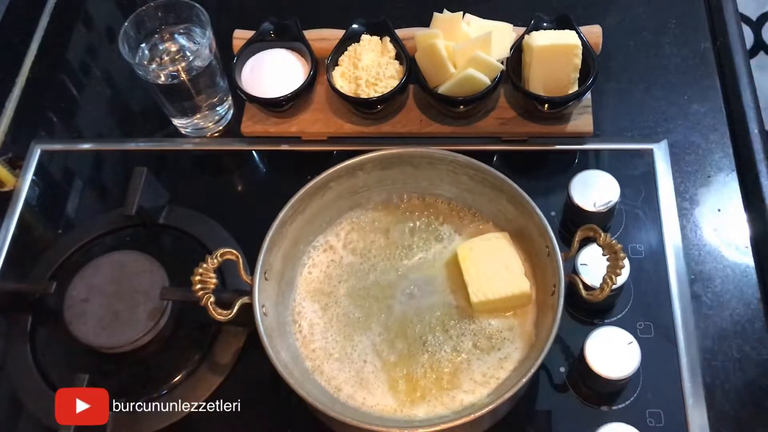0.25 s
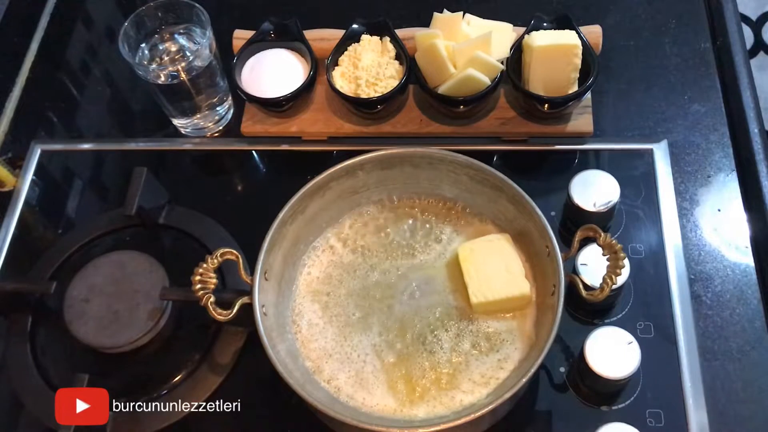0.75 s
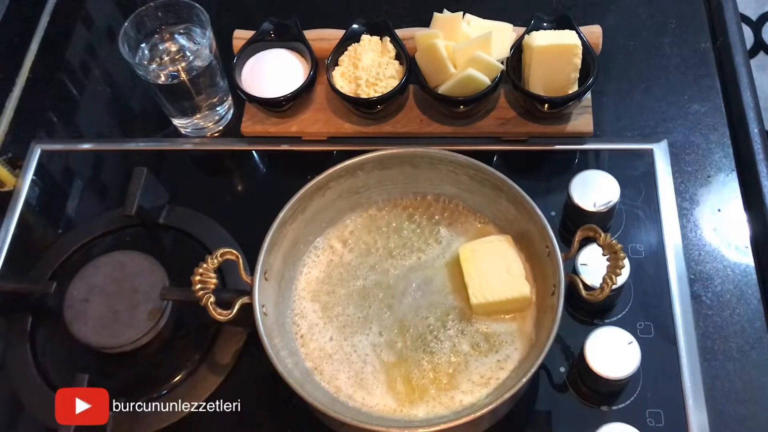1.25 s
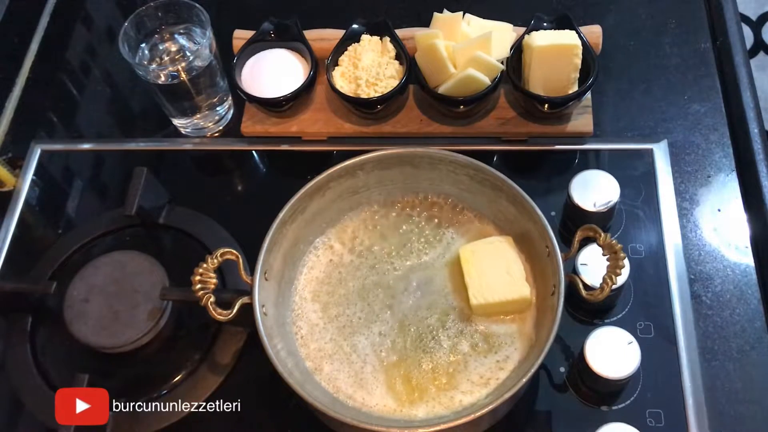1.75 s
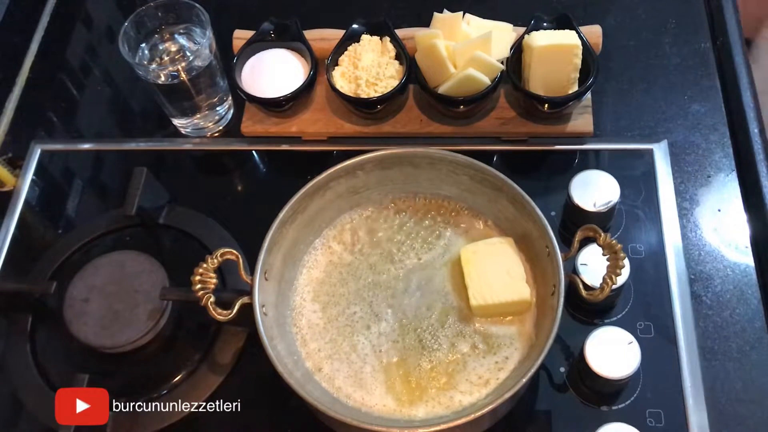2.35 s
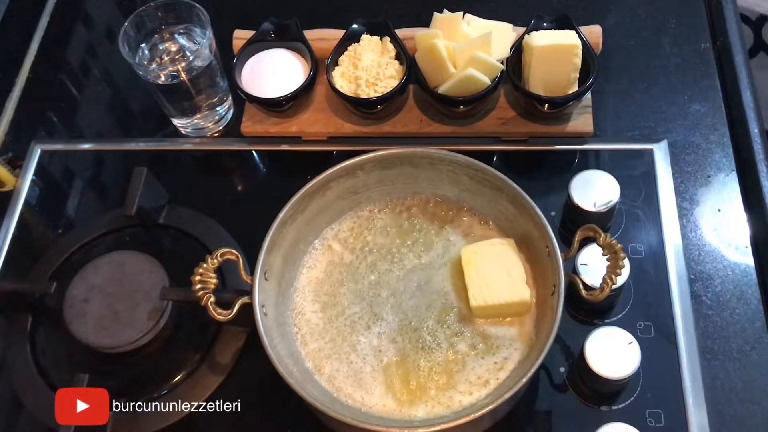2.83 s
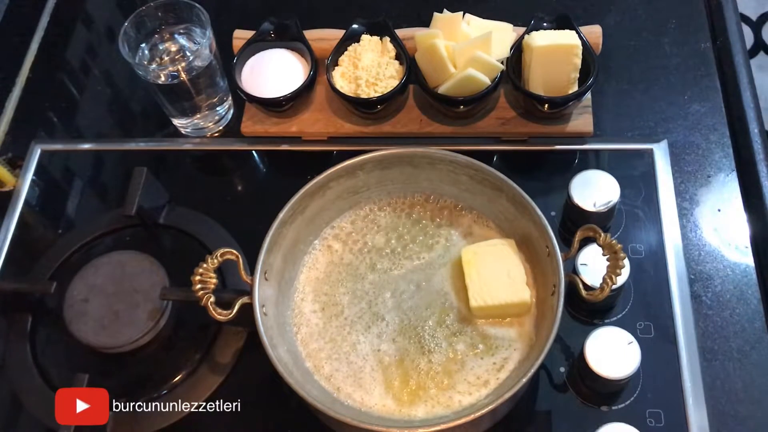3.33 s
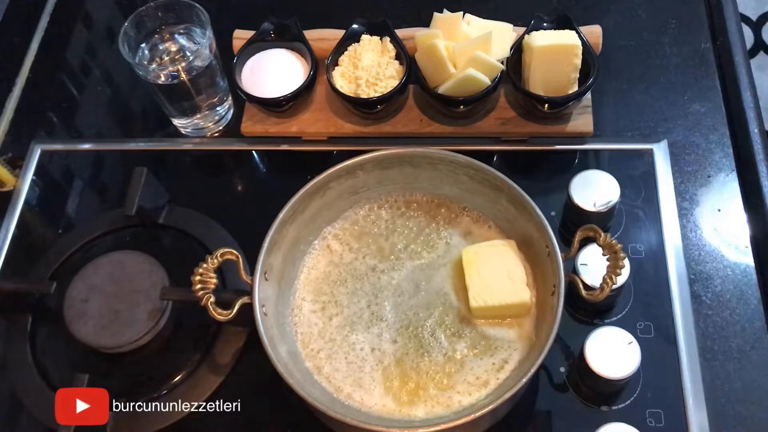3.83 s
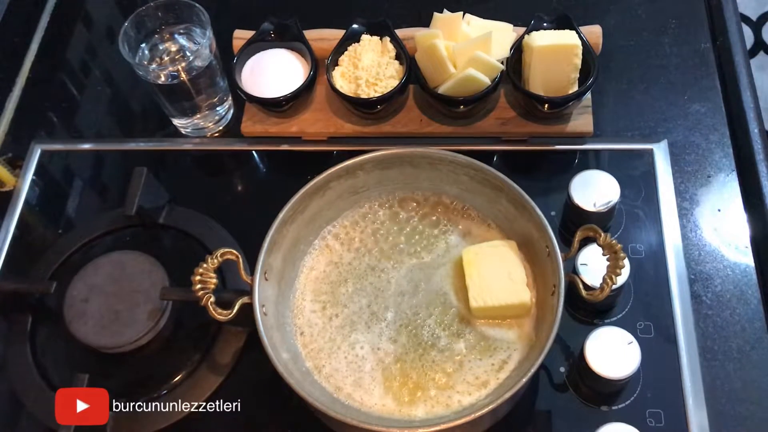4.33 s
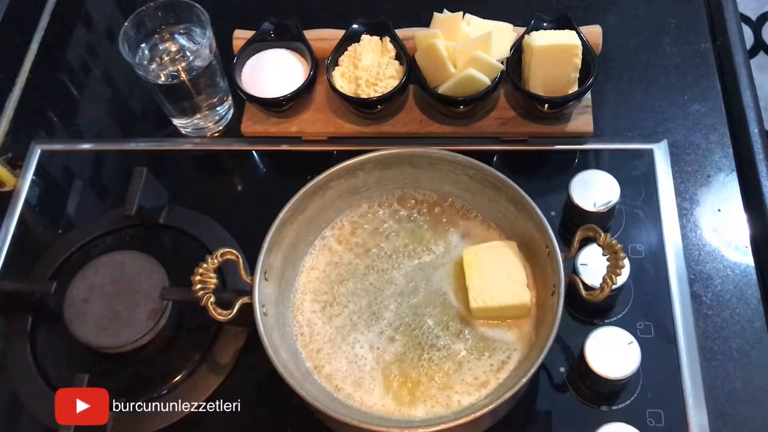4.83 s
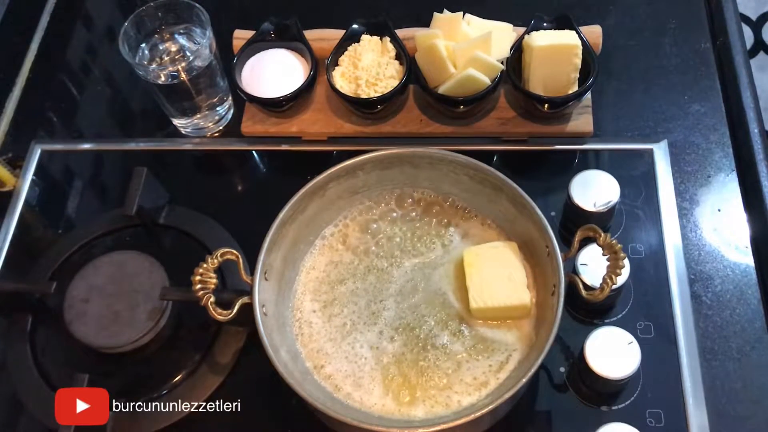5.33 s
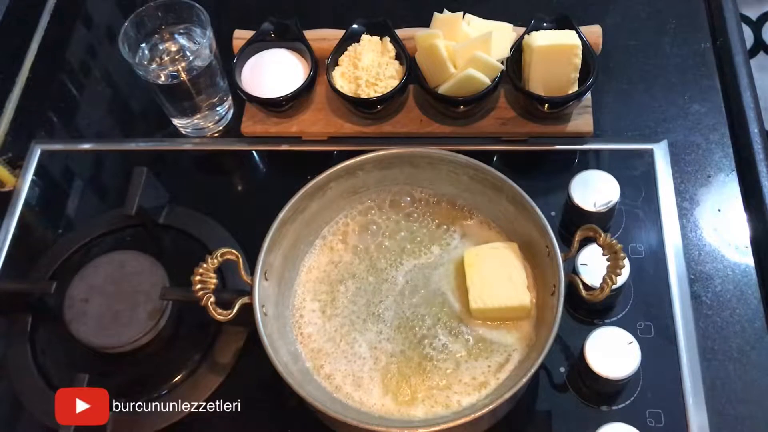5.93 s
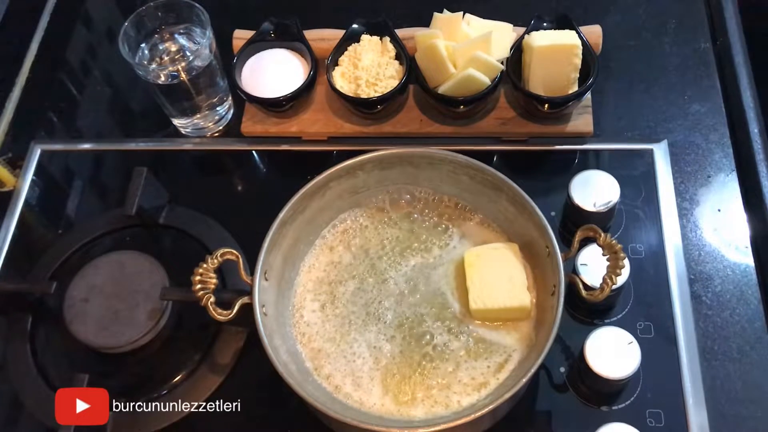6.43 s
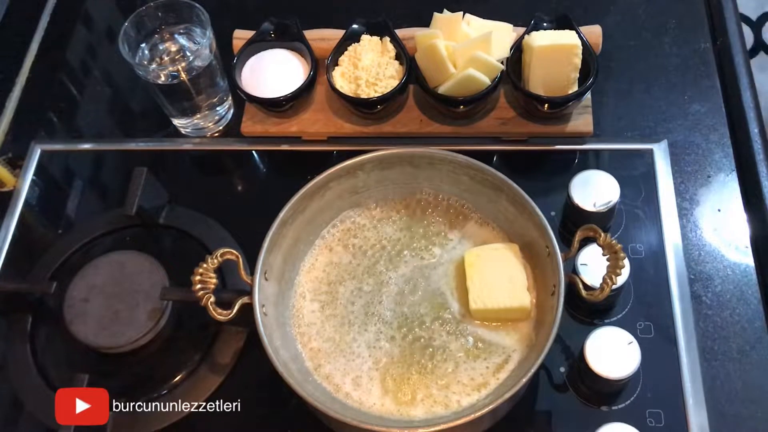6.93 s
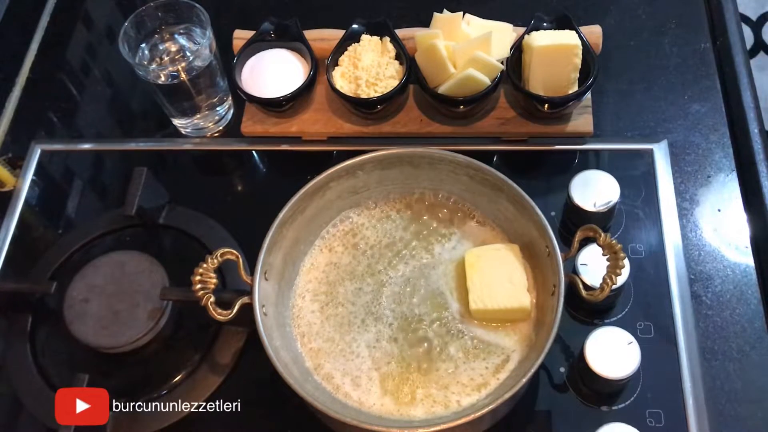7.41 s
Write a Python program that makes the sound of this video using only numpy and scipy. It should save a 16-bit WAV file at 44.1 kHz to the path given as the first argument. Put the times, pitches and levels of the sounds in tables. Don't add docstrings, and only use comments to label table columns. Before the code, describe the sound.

Butter sizzles and crackles steadily in a pan while a fridge hums low; footsteps scuff and one hard knock thuds midway.

```python
import sys
import numpy as np
from scipy import signal
from scipy.fft import rfft, irfft
from scipy.io import wavfile
from scipy.ndimage import map_coordinates

SR = 44100
rng = np.random.default_rng(int(sys.argv[2]) if len(sys.argv) > 2 else 0)


def dump_mix(stems):
    frames = np.atleast_2d(stems).T
    limited = np.clip(frames, -1, 1)
    pcm = np.round(limited * 32767).astype(np.int16)
    wavfile.write(sys.argv[1], SR, pcm)


def makeup_ratio(level_db):
    decades = np.asarray(level_db, float) / 20
    return 10 ** decades


N = 338247


def rms_one(x):
    return x / np.sqrt(np.mean(x ** 2) + 1e-20)


def white(length=N):
    return rng.standard_normal(length)


def band(x, order, hz, kind):
    return signal.sosfilt(signal.butter(order, hz, kind, fs=SR, output="sos"), x)


def in_time(rows):
    start_s, *columns = np.transpose(rows)
    return [np.interp(np.arange(N) / SR, start_s, column) for column in columns]


def drift(rate_hz):
    r = np.exp(-80 * np.pi * rate_hz / SR)
    slow = signal.lfilter([1], [1, -2 * r, r * r], white(N // 40 + 2002))[2000:]
    return np.interp(np.arange(N) / 40, np.arange(len(slow)), rms_one(slow))


def colour(x, spectrum, tilt_db=0):
    hz = np.maximum(np.arange(2049) * SR / 4096, 10)
    point_hz, point_db = np.transpose(spectrum)
    db = np.interp(np.log(hz), np.log(point_hz), point_db)
    db = db + tilt_db * np.log2(np.maximum(hz, 150) / 4000)
    cepstrum = irfft(db * np.log(10) / 20)
    cepstrum[1:2048] *= 2
    cepstrum[2049:] = 0
    response = irfft(np.exp(rfft(cepstrum)))
    return signal.fftconvolve(x, rms_one(response) / 64)[:len(x)]


def ring(clicks, hz, t60_s):
    r = makeup_ratio(-60 / (t60_s * SR))
    w = 2 * np.pi * min(hz, .45 * SR) / SR
    return signal.lfilter([0, np.sin(w)], [1, -2 * r * np.cos(w), r * r], clicks + 1e-18)


def add(out, start_s, sound):
    i = round(start_s * SR)
    out[i:i + len(sound)] += sound[:N - i]


def grainy_resonance(table, width, grain_db, sag_octaves):
    out = np.zeros(N)
    for start_s, level_db, pitch_hz, length_s in table:
        t = np.linspace(0, 1, round(1.8 * length_s * SR))
        read = np.cumsum(2 ** (sag_octaves * (.3 - t)))
        size = 2 * len(t)
        unevenness = makeup_ratio(grain_db * white(size // 90 + 1)).repeat(90)[:size]
        grains = white(size) * unevenness
        t60_s = 2.2 / (width * pitch_hz)
        resonant = ring(ring(grains, pitch_hz, t60_s), pitch_hz, t60_s)
        sound = rms_one(map_coordinates(resonant, [read], order=3))
        swell = np.sin(np.pi * t ** 0.32) * makeup_ratio(4.0 - 6.8 * t)
        add(out, start_s, makeup_ratio(level_db) * swell * sound)
    return out


# (start_s, fizz_db, rumble_db)
SIMMER_CURVE = [(0.0, -53, -37), (0.17, -52, -56), (0.77, -55, -59), (1.3, -56, -58), (1.69, -57, -66),
                (2.09, -53, -56), (2.52, -55, -54), (3.54, -58, -66), (3.74, -55, -66), (3.97, -55, -56),
                (4.12, -57.5, -48.5), (4.44, -55, -69), (4.7, -58.5, -49), (4.93, -54, -56),
                (5.15, -56, -60), (6.45, -55, -61), (6.62, -56, -60), (7.67, -55, -66)]


def simmer():
    return in_time(SIMMER_CURVE)


# (pitch_hz, level_db per Hz)
PAN_COLOUR = [(590, -41), (1000, 6), (1590, -20.5), (2060, -9.5), (2760, -5.5), (3400, -9), (4820, -6.5),
              (5290, -5), (7680, -2.5), (12700, -10.5), (16200, -17)]


def fizz(per_s, spread_db, clump_db, cycles):
    strengths = makeup_ratio(spread_db * np.minimum(rng.exponential(1, N), 3.5)) * rng.choice([-1, 1], N)
    clumps = [per_s * makeup_ratio(clump_db * drift(17)) / SR for size in ("large", "middle", "small")]
    draw = rng.random(N)
    dealt = rng.integers(0, 24, N)
    rings = 0
    for k, hz in enumerate(np.geomspace(1500, 15500, 24)):
        born = strengths * (draw < clumps[k // 8]) * (dealt == k)
        swelling = ring(born, hz, 1.2 / hz)
        rings = rings + ring(swelling, hz, cycles / hz) * (hz / 5000) ** 0.98
    return rms_one(colour(rings, PAN_COLOUR, tilt_db=3.0))


def rumble(rumble_db):
    return makeup_ratio(rumble_db) * rms_one(band(white(), 3, [38, 85], "band"))


# (start_s, level_db)
ROLL_CURVE = [
    (0.0, -49),
    (1.2, -48.5),
    (2.0, -60.5),
    (2.9, -64),
]
# (pitch_hz, level_db per Hz)
ROLLING_COLOUR = [(71, -30), (120, 6), (205, -11.5), (296, -0.5), (367, -9.5), (551, -9.5), (711, -17),
                  (1030, -8.5), (2500, -24.5), (3250, -36), (5500, -120)]


def roll():
    return makeup_ratio(in_time(ROLL_CURVE)[0] + 0.63 * drift(11.0)) * rms_one(colour(white(), ROLLING_COLOUR))


# (pitch_hz, level_db per Hz)
ROOM_COLOUR = [(53, -25.5), (90, 1), (119, -12.5), (151, -11.5), (224, -21.5), (448, -29), (532, -33),
               (737, -34), (915, -29.5), (1750, -25), (2090, -19), (2830, -28.5), (6030, -25.5),
               (12600, -31), (16000, -33.5)]


def room_air(hiss_db):
    air = makeup_ratio(-54.5 + 0.2 * drift(1.4)) * rms_one(colour(white(), ROOM_COLOUR))
    treble = band(air, 2, 3000, "high")
    return air + treble * (makeup_ratio(hiss_db + 2.3 * drift(10.5)) - 1)


# (pitch_hz, level_db rms, wobble_db)
FRIDGE_TONES = [
    (99.8, -48.5, 0),
    (148.5, -66.5, 2),
    (505, -86, 4),
    (541, -68, -2.8),
    (597, -82, 1),
    (905, -80.5, -4),
]


def fridge():
    t = np.arange(N) / SR
    out = np.zeros(N)
    for pitch_hz, level_db, wobble_db in FRIDGE_TONES:
        height = np.sqrt(2) * makeup_ratio(level_db + wobble_db * drift(1.56))
        out += height * np.sin(2 * np.pi * pitch_hz * t + 0.26 * drift(4.3))
    return out


# (start_s, level_db, rise_s, t60_s, tilt_db per octave)
SCUFF_EVENTS = [(.032, -29.5, 0.0035, 0.28, 4), (0.308, -28.5, 0.0045, 0.3, 3),
                (1.108, -45, 0.002, 0.17, -2), (1.284, -40.5, 0.003, 0.27, 1.5),
                (3.991, -41.5, 0.0099, 0.47, -6), (4.327, -34, 0.0053, 0.57, 1.5),
                (4.407, -29, 0.0052, 0.4, 1.5), (4.758, -39.5, 0.0041, 0.34, 1.5)]
# (pitch_hz, level_db per Hz)
SCUFFING_COLOUR = [(120, 0.5), (200, -17), (322, -6.5), (373, -11.5), (635, -7), (986, -12), (1080, -10),
                   (6050, -10.5), (16000, -31)]


def scuffs():
    out = np.zeros(N)
    t = np.arange(SR // 2) / SR
    for start_s, level_db, rise_s, t60_s, tilt_db in SCUFF_EVENTS:
        noise = rms_one(colour(white(len(t)), SCUFFING_COLOUR, tilt_db))
        dull = band(noise, 2, 6500, "low")
        noise = dull + (noise - dull) * makeup_ratio(-40 * t / t60_s)
        grit = makeup_ratio(1.13 * white(len(t) // 210).repeat(210))
        swell = (1 + 0.55 * np.exp(-t / 0.011)) * (1 - np.exp(-t / rise_s)) ** 2
        add(out, start_s, makeup_ratio(level_db - 60 * t / t60_s) * swell * grit * noise)
    return out


# (start_s, level_db, pitch_hz, length_s)
BOARD_EVENTS = [(.035, -45, 340, 0.082), (.035, -53, 540, 0.081), (.06, -45, 132.6, 0.11),
                (.312, -51, 694, 0.062), (1.111, -50.5, 1110, 0.011), (1.288, -44, 1130, 0.0087),
                (1.29, -49, 2000, 0.031), (2.32, -54, 172, 0.23), (2.33, -60.5, 258, 0.18),
                (2.33, -59.5, 390, 0.073), (4.333, -52, 770, 0.062), (4.45, -33, 134, 0.083),
                (4.41, -47.5, 270, 0.051), (4.412, -49.5, 420, 0.032), (4.764, -50.5, 517, 0.014)]


def boards():
    return grainy_resonance(BOARD_EVENTS, width=0.3, grain_db=1.5, sag_octaves=0)


# (start_s, peak_db, pitch_hz, length_s)
THUD_EVENTS = [(.0435, -23, 68, .075), (.333, -34, 72, .045), (4.015, -33, 70, .06), (6.465, -38, 57, .07),
               (4.409, -8.2, 63, .044), (4.454, -15, 83, .046), (4.502, -25, 65, .05),
               (4.565, -31, 55, .05), (4.413, -23, 120, .045), (4.7795, -25.5, 74, .026),
               (4.8045, -26, 72, .055), (4.86, -37, 55, .07), (.112, -35, 60, .08)]


def thuds():
    out = np.zeros(N)
    t = np.arange(SR // 2) / SR
    for start_s, peak_db, pitch_hz, length_s in THUD_EVENTS:
        swell = np.sin(np.pi * np.minimum(t / length_s, 1) ** .7)
        add(out, start_s, makeup_ratio(peak_db) * swell * np.sin(2 * np.pi * pitch_hz * t))
    return out


def pops(table, cycles, tick_db, spread):
    out = np.zeros(N)
    click = signal.unit_impulse(500)
    crack = np.diff(ring(click, 7000, 3.5 / 7000), prepend=0)
    chances = rng.uniform(-1, 1, (len(table), 3))
    for (start_s, peak_db, pitch_hz), (sign, detune, hard) in zip(table, chances):
        crack_db = -4.0 + 4.0 * hard
        tick = makeup_ratio(tick_db) * ring(click, pitch_hz, 16.0 / pitch_hz) + makeup_ratio(crack_db) * crack * 2
        t60_s = cycles / pitch_hz
        second = ring(click, pitch_hz * (1 + spread * detune), t60_s)
        burst = tick + ring(click, pitch_hz, t60_s) + 0.86 * second
        add(out, start_s, np.sign(sign) * makeup_ratio(peak_db) * burst / np.abs(burst).max())
    return out


def lesser_bubbles(vigour_db, count, top_db, range_db, middle_hz, octaves):
    when, size, pitch = rng.random((count, 3)).T
    so_far = np.cumsum(makeup_ratio(2.5 * vigour_db))
    start_s = np.interp(when * so_far[-1], so_far, np.arange(N) / SR)
    peak_db = top_db - range_db * size ** 2
    pitch_hz = middle_hz * 2 ** (2 * octaves * (2 * pitch - 1))
    return np.transpose([start_s, peak_db, pitch_hz])


# (start_s, peak_db, pitch_hz)
MIDDLE_BUBBLES = [(0.2427, -23, 6200), (0.6417, -27, 6000), (0.8388, -23, 6850), (0.8655, -19.5, 6500),
                  (1.8617, -27, 6500), (2.0907, -20, 5840), (2.1159, -21.5, 8650), (2.5325, -25, 5730),
                  (2.542, -25, 6740), (2.7856, -22, 5900), (3.1705, -25.5, 7100), (3.1857, -24, 8100),
                  (3.3103, -25, 6240), (3.5538, -21.5, 6540), (3.694, -28, 6300), (3.7059, -21.5, 6130),
                  (3.7281, -24, 5840), (3.7626, -24, 8000), (4.193, -21, 8700), (4.2701, -26, 7400),
                  (5.3806, -27, 8640), (5.704, -32.5, 7200), (5.997, -23, 6040), (6.0132, -19, 6050),
                  (6.0421, -23, 6040), (6.1183, -23, 5940), (6.3453, -24, 8150), (6.801, -24, 7360),
                  (6.9973, -24, 6660), (7.6062, -23, 6940)]
# (start_s, peak_db, pitch_hz)
SMALL_BUBBLES = [(0.2481, -24, 10200), (0.6171, -18.5, 11700), (0.6417, -19.5, 12800), (0.8657, -22, 9400),
                 (1.1703, -29, 10200), (1.3676, -29, 13000), (1.8679, -19, 11800), (2.2029, -29, 10900),
                 (2.3432, -23, 11300), (2.5483, -25.5, 9900), (3.1054, -23.5, 9750), (3.2903, -22, 12400),
                 (3.3283, -25.5, 11200), (3.5407, -25.5, 14400), (3.7238, -25, 12400), (4.0549, -21, 13400),
                 (4.2552, -27, 12900), (5.0163, -26, 10850), (5.4534, -23, 11200), (5.5272, -27, 11800),
                 (6.1186, -27, 10700), (6.1859, -22.5, 9600), (6.3446, -24, 11200), (6.4145, -27, 11900),
                 (6.6752, -23, 11400), (6.8537, -26, 11200), (6.9553, -22.5, 12600), (7.0086, -26, 12700),
                 (7.2371, -26, 13500), (7.6076, -25.5, 12600)]
# (start_s, peak_db, pitch_hz)
LARGE_BUBBLES = [(0.5303, -25, 5300), (1.2643, -18.5, 5230), (1.868, -29.5, 4300), (2.0159, -29, 5700),
                 (2.1253, -37, 5400), (2.1397, -28, 4530), (2.1714, -20, 5430), (2.1837, -30, 4500),
                 (2.2335, -29, 5560), (2.2587, -31, 5330), (2.8652, -27.5, 4500), (3.2651, -29, 4440),
                 (3.7381, -25, 4600), (4.5825, -17, 5600), (4.7605, -23.5, 4430), (5.0161, -22.5, 4360),
                 (5.1041, -25, 4560), (5.4532, -28, 5130), (5.5272, -32.5, 4640), (5.6426, -27, 5370),
                 (5.7295, -26, 5140), (5.9175, -30, 5700), (6.0781, -31, 5230), (6.1483, -29, 5600),
                 (6.3976, -28, 4630), (6.6383, -34, 5300), (6.955, -22.5, 4440), (7.3323, -27, 5050),
                 (7.3436, -33, 5600), (7.657, -25, 5370)]


def single_bubbles(fizz_db):
    lesser_pops = lesser_bubbles(fizz_db, count=180, top_db=-32, range_db=9, middle_hz=5800, octaves=.22)
    lesser_snaps = lesser_bubbles(fizz_db, count=60, top_db=-33, range_db=11, middle_hz=11700, octaves=.15)
    single = pops([*LARGE_BUBBLES, *MIDDLE_BUBBLES], cycles=28.0, tick_db=-5, spread=.25) * makeup_ratio(-1.5)
    single = single + pops(SMALL_BUBBLES, cycles=29.0, tick_db=-15, spread=0.19)
    single = single + pops(lesser_pops, cycles=26.0, tick_db=-3, spread=.2)
    single = single + pops(lesser_snaps, cycles=30.0, tick_db=-6, spread=.15)
    return band(single, 2, 2500, "high")


# (start_s, level_db, pitch_hz, length_s)
SPUTTER_EVENTS = [(.525, -52, 6100, 0.026), (2.151, -55, 5400, 0.033), (2.784, -52, 5800, 0.035),
                  (3.699, -54, 5500, 0.077), (4.235, -52.5, 5350, 0.04), (4.708, -52, 6500, 0.015),
                  (5.002, -48, 5800, 0.013), (5.016, -48, 4240, 0.028), (5.018, -50, 7500, .035),
                  (5.079, -48.5, 5250, 0.029), (5.14, -54, 5500, 0.012), (5.999, -57.5, 5760, 0.048),
                  (6.08, -50, 5200, 0.011), (6.09, -46.5, 3880, 0.023), (6.12, -53, 5000, 0.028),
                  (6.238, -48.5, 6040, 0.021), (6.389, -49, 6360, 0.015), (6.46, -52, 5600, .015),
                  (6.625, -53.5, 5170, 0.019), (7.03, -49, 5570, 0.011), (6.942, -47, 4700, 0.024),
                  (7.184, -48, 5560, .008), (7.205, -53, 5450, 0.023), (7.232, -52, 7500, 0.011),
                  (7.281, -46, 5500, .024), (7.29, -54, 3550, .035), (7.298, -47, 6800, 0.012),
                  (7.31, -55, 5030, 0.048)]


def sputters():
    return grainy_resonance(SPUTTER_EVENTS, width=.3, grain_db=4.0, sag_octaves=.55)


def hood_and_walls(x, echo_db, tail_db, tail_t60_s):
    t = np.arange(int(.25 * SR)) / SR
    tail = white(len(t)) * makeup_ratio(tail_db - 60 * t / tail_t60_s) * (t > .001)
    tail[round(.0039 * SR)] += makeup_ratio(echo_db)
    return x + signal.fftconvolve(x, tail)[:N]


def scene():
    fizz_db, rumble_db = simmer()
    hiss_db = 0.37 * (fizz_db - fizz_db.mean())
    house = rumble(rumble_db + 2.5) + roll() + room_air(hiss_db)
    steps = scuffs() + boards() + thuds()
    sizzle = makeup_ratio(fizz_db - 0.5) * fizz(per_s=1300, spread_db=6.0, clump_db=5.0, cycles=32.0)
    bursts = sizzle + single_bubbles(fizz_db) + sputters()
    pan = hood_and_walls(bursts, echo_db=-17, tail_db=-33, tail_t60_s=.08)
    return (pan + house + fridge() + steps)[None]


def gain_control(x):
    from_level_db, share, recover_db_per_s, lag_s = -28.5, 0.088, 48, .12
    fall = recover_db_per_s * np.arange(N) / SR
    level_db = 20 * np.log10(np.abs(x) + 1e-9)
    held_db = np.maximum.accumulate(level_db + fall, axis=-1) - fall
    r = np.exp(-1 / (lag_s * SR))
    excess_db = signal.lfilter([1 - r], [1, -r], np.maximum(held_db - from_level_db, 0))
    return x * makeup_ratio(-share * excess_db)


# (pitch_hz, width_hz, depth 0-1)
HOB_DIPS = [
    (2800, 450, .4),
    (4900, 300, .35),
    (7600, 700, .3),
    (10400, 1000, .4),
]


def hob_reflection(x):
    for pitch_hz, width_hz, depth in HOB_DIPS:
        peak = signal.iirpeak(pitch_hz, pitch_hz / width_hz, fs=SR)
        x = x - np.clip(depth, 0, 1) * signal.lfilter(*peak, x)
    return x


def roll_off(x):
    return signal.sosfilt(signal.butter(12, 16810, fs=SR, output="sos"), x)


def record(dry):
    mix = hob_reflection(gain_control(dry))
    mix = signal.sosfilt(signal.cheby2(14, 36, 15900, fs=SR, output="sos"), mix)
    return roll_off(mix)


dry = scene()
out = record(dry)
dump_mix(out)
```